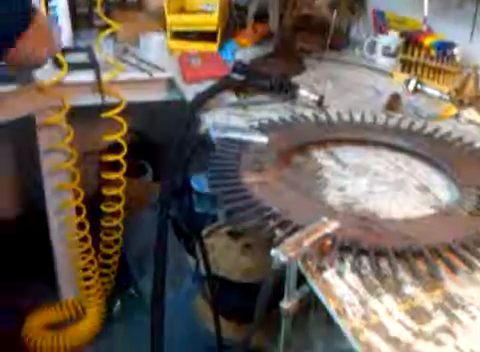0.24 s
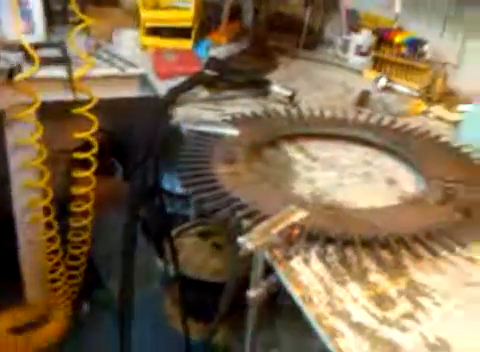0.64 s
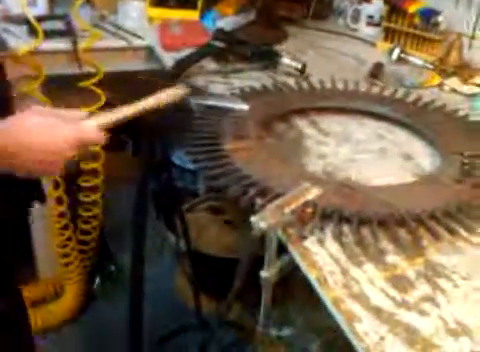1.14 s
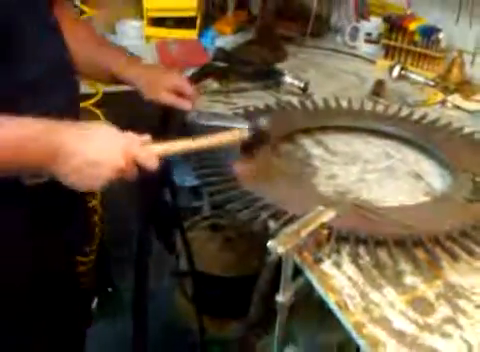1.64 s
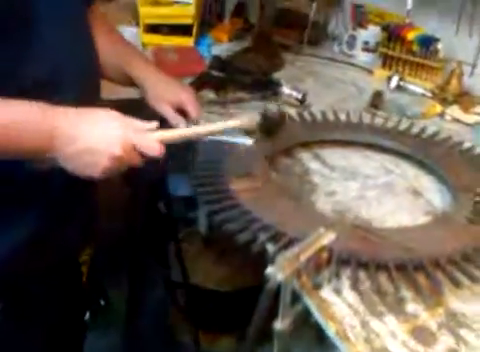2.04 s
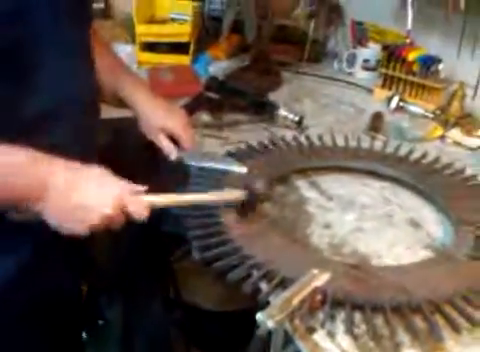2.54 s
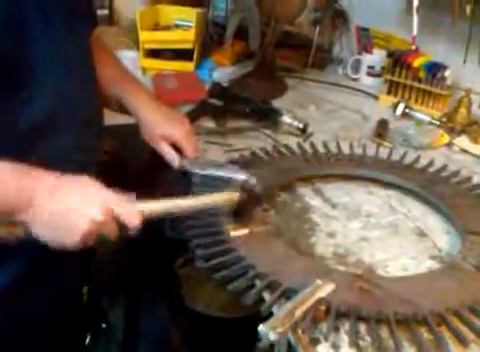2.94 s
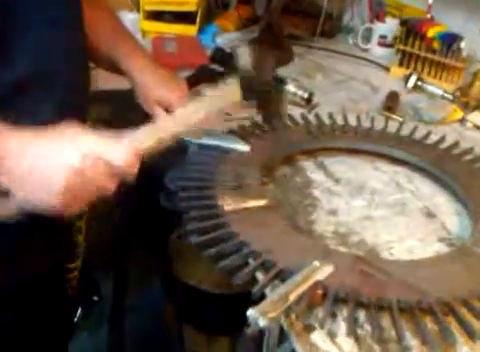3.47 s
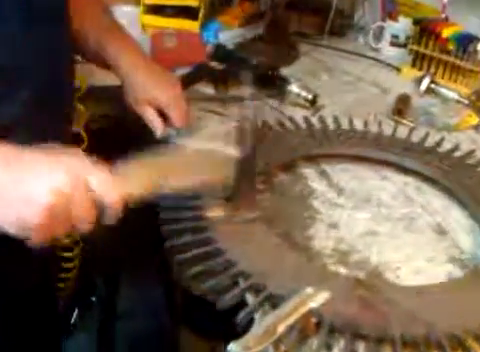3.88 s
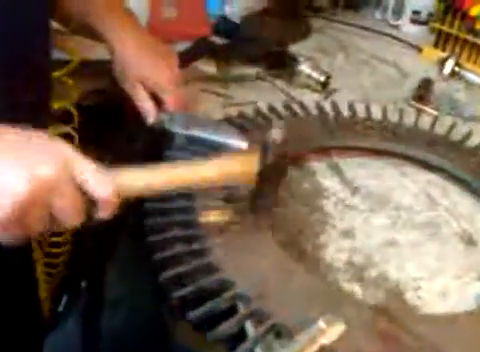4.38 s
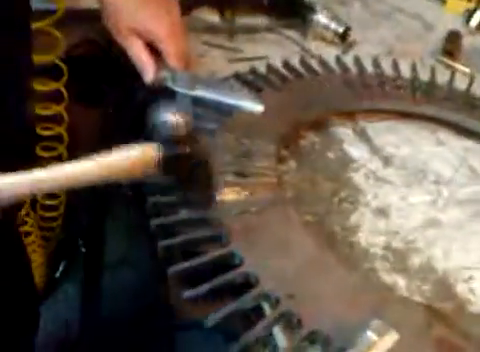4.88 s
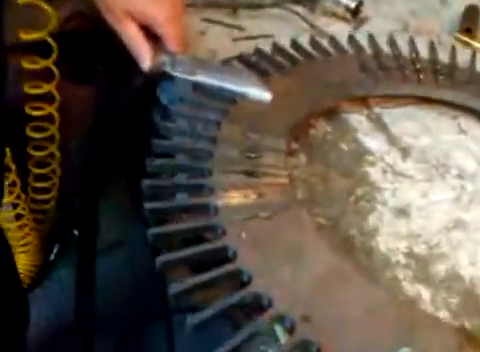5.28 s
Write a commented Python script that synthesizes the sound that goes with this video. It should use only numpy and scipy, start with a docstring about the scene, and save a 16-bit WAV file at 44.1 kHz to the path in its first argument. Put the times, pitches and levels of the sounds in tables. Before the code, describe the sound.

Steady hammer blows clang on a finned metal gear, thumping the workbench and leaving a shimmering ring.

```python
"""A hammer drives a fin into a large steel gear on a workbench: ten blows, about three a second.
Each blow thumps the bench, crashes through the gear and leaves its crown of nearly equal fins ringing.
Before the first blow come soft scuffs, a faint squeak, a tink and a light tap. A distant motor hums
in the small workshop, and the close microphone overloads on the blows."""
import sys
import numpy as np
from scipy import signal
from scipy.fft import rfft, irfft
from scipy.io import wavfile
from scipy.ndimage import uniform_filter1d

SR = 44100
rng = np.random.default_rng(int(sys.argv[2]) if len(sys.argv) > 2 else 0)


def unload_wav(signal):
    """Save mono or channel-first audio to the path in sys.argv[1] as 16-bit WAV at rate SR, clipped to [-1, 1]."""
    wavfile.write(
        sys.argv[1],
        SR,
        np.round(np.clip(np.atleast_2d(signal).T, -1, 1) * 32767).astype(np.int16),
    )


N = 243187

# Still air in the room: (frequency [Hz], relative level [dB])
AIR_SPECTRUM = [(12, -66), (20, -0.5), (131, 0), (205, -9), (237, 1.5), (269, -8.5), (380, 3.5), (420, -9),
                (1250, -16), (1520, -15.5), (2550, -22.5), (5640, -23), (7400, -26.5), (9620, -72.5),
                (16300, -120)]
# Tones of the distant motor: (frequency [Hz], level [dB])
MOTOR_TONES = [(376.8, -70.5), (748.3, -70.5), (1475, -70.5)]
# Soft scuffs, then a light tap just before the first blow:
# (time [s], length [s], level [dB], brightness [dB per octave])
SCUFFS_AND_TAP = [(0.091, 0.057, -51.5, 0), (0.17, 0.085, -54, 1.5), (0.231, 0.17, -45, 2.5),
                  (0.405, 0.13, -56, -6), (1.736, 0.021, -47, 4), (1.753, 0.051, -53.5, 8)]
# Noise of the scuffs and the tap: (frequency [Hz], relative level [dB])
HANDLING_SPECTRUM = [(40, -11), (130, 5.5), (350, -7.5), (550, -9.5), (780, -12), (1100, -18.5),
                     (2500, -33), (7000, -43.5)]
# Tones of a loose piece of steel: (frequency [Hz], level [dB], ring time [s])
# A ring time, or t60, is how long a sound takes to fade by 60 dB.
TINK_TONES = [(4160, -59, 0.22), (5500, -51, 0.077), (5940, -60, 0.17)]
# Dull boom of the room: (frequency [Hz], relative level [dB])
BOOM_SPECTRUM = [(20, 8), (70, -12), (130, 4), (250, -10), (400, -4), (600, -14.5), (1100, -21),
                 (2100, -22), (7000, -51.5)]
# Tones of the bench top under the gear: (frequency [Hz], relative level [dB], ring time [s])
BENCH_TONES = [(76, -32.5, 0.2), (124, -45.5, 0.58), (159.6, -3, 0.14), (205, -14, 0.13),
               (232.9, -9.5, 0.15), (350, -12.5, 0.28), (389.5, -2.5, 0.21), (417, -6, 0.23),
               (556, -23, 0.36), (587, -31, 0.11), (779, -11.5, 0.23), (832, -17.5, 0.27),
               (865, -13.5, 0.12)]
# Gear body, short clank first, then lasting tones: (frequency [Hz], relative level [dB], ring time [s])
GEAR_TONES = [(1155, -18, .22), (1243, -14, .3), (1461, -16, .27), (1800, -18, .2), (2270, -19, .26),
              (2720, -21, .22), (3361, -23, .2), (3965, -18, .2), (4230, -24, .2), (4672, -24, .2),
              (5120, -26, .2), (1244, -23, .75), (1256, -29, 1.15), (1324, -47, 2.2), (1391, -49, 2.2),
              (1480, -43, .8), (1661, -30.5, 2.2), (2357, -34, .55), (2495, -41, 1.4), (2663, -34.5, 1.7),
              (2764, -42, .9), (3079, -47, .9), (3561, -43, 1.2), (4517, -51, 1.5), (4904, -55, 1.4),
              (5060, -49, 1.4), (5437, -27, .5), (5509, -30, .58), (7275, -25, .4), (7345, -32, .33)]
# Bending tones that all fins share: (frequency [Hz], spread [Hz], relative level [dB], ring time [s])
FIN_TONES = [(1672, 3, -36.5, 2.1), (1652, 15, -35.5, 2.0), (2680, 9, -43, 1.8), (3559, 1.5, -54, 1.0),
             (1640, 110, -43, 1.5), (2590, 80, -39, 1.3), (3440, 150, -54, 1.1), (4310, 55, -56, 1.1),
             (5180, 200, -55, 1.1), (5940, 80, -66, 1.1), (6800, 100, -68, .8)]
# Dense crash of gear, bench and room: (frequency [Hz], relative level [dB])
CRASH_SPECTRUM = [(25, -27.5), (70, -7), (170, 1), (400, -2), (520, -1), (800, -2), (1300, 1), (2000, -5),
                  (3400, -1), (5000, 0.5), (6200, -5), (7400, -7)]
# How long early echoes hold the crash up: (frequency [Hz], base hold time [s])
CRASH_HOLD_TIMES = [(200, 0.021), (800, 0.024), (2000, 0.022), (4000, 0.0019)]
# How long the crash then takes to fade: (frequency [Hz], base ring time [s])
CRASH_RING_TIMES = [(60, 0.22), (200, .23), (550, 0.18), (1500, 0.2), (3900, 0.16), (7000, 0.13)]
# Hammer blows: (time [s], force [dB], glancing [0-1], extra fin ring [dB],
# note of the struck spot [Hz], level of that note [dB])
HAMMER_BLOWS = [(1.8324, 1, 0.85, -3, 3850, -30), (2.162, -6, 0, 0, 3960, -40),
                (2.494, -1, 0, 1, 1234, -8.5), (2.8222, 1.5, 0.18, 2.5, 1787, -5.5),
                (3.1595, 1, 0.05, 1, 3994, -13.5), (3.496, .5, 0, -1, 772, -19),
                (3.8356, 2.5, 0.01, 0.5, 3980, -22), (4.188, 2, 0.01, -0.5, 3145, -25.5),
                (4.5746, 4.5, 0, 0, 2313, -9), (4.9689, 6, 0.24, 10, 2250, -1.5)]

TOP_HZ = 7420  # upper edge of the sound
RING_CLOCK = np.arange(2 * SR) / SR  # seconds since a blow


def gain_of(db):
    """Turns decibels into a factor to multiply a sound by."""
    return 10 ** (np.asarray(db) / 20)


def unit_level(x):
    """Scales a signal to an average (rms) size of 1."""
    return x / np.sqrt(np.mean(x ** 2) + 1e-20)


def wobble(samples, smooth_over):
    """A smooth random curve of average size 1."""
    return unit_level(uniform_filter1d(rng.standard_normal(samples), size=smooth_over))


def look_up(points, hz):
    """Reads between (frequency, value) points, giving each octave equal room."""
    known_hz, value = np.transpose(points)
    return np.interp(np.log(hz + 1), np.log(known_hz + 1), value)


def add(mix, start_s, sound):
    """Mixes a sound in at its start time."""
    part = mix[round(start_s * SR):][:len(sound)]
    part += sound[:len(part)]


def colour(noise, spectrum, tilt_db=0):
    """Shapes noise to a spectrum at average size 1; a tilt above 0 dB per octave brightens it."""
    hz = np.fft.rfftfreq(len(noise), 1 / SR)
    octaves = np.log2(np.clip(hz, 60, 4000) / 1000)
    shape = gain_of(look_up(spectrum, hz) + tilt_db * octaves) * (hz < TOP_HZ)
    return unit_level(irfft(rfft(noise) * shape, len(noise)))


def ring(tones, scatter_db=0):
    """A struck object rings with fading tones; scatter varies their strength from hit to hit."""
    out = np.zeros(2 * SR)
    for hz, db, t60 in tones:
        t = np.arange(int(min(1.3 * t60, 2) * SR)) / SR
        start_db = db + scatter_db * rng.standard_normal()
        out[:len(t)] += gain_of(start_db - 60 * t / t60) * np.sin(2 * np.pi * (hz * t + rng.random()))
    return out


def workshop(waver=0.0028, air_db=-55):
    """Still air, and a distant motor whose hum wavers with its speed."""
    speed = 1 + waver * wobble(N, smooth_over=2000)
    motor_time = np.cumsum(speed) / SR
    hum = sum(gain_of(db) * np.sqrt(2) * np.sin(2 * np.pi * hz * motor_time) for hz, db in MOTOR_TONES)
    return hum + gain_of(air_db) * colour(rng.standard_normal(N), AIR_SPECTRUM)


def sole_squeak(length_s=0.1, hz=785, db=-50):
    """A shoe sole sticks and slips, making a tone that swells and fades."""
    t = np.arange(int(length_s * SR)) / SR
    return gain_of(db) * np.sin(np.pi * t / length_s) * np.sin(2 * np.pi * hz * t)


def handling(grain_db=2.0):
    """Soft scuffs, then a light tap just before the first blow; a sole squeaks and loose steel tinks."""
    out = np.zeros(N)
    for start_s, length_s, db, tilt_db in SCUFFS_AND_TAP:
        noise = colour(rng.standard_normal(SR), HANDLING_SPECTRUM, tilt_db)
        noise *= gain_of(grain_db * wobble(SR, smooth_over=300))
        progress = np.linspace(0, 1, int(length_s * SR))
        swell = np.sin(np.pi * progress ** 0.92)
        add(out, start_s, gain_of(db) * unit_level(noise[:len(swell)] * swell))
    add(out, start_s=0.235, sound=sole_squeak())
    add(out, start_s=1.418, sound=ring(TINK_TONES))
    return out


def room_boom(force_db, t60=1.24):
    """A blow lingers in the room as dull, fading noise."""
    rumble = colour(rng.standard_normal(len(RING_CLOCK)), BOOM_SPECTRUM)
    return gain_of(-33 + 0.7 * force_db - 60 * RING_CLOCK / t60) * rumble


def bench_thud(force_db, rise_s=0.0019):
    """The heavy bench takes a few milliseconds to get moving, then rings low."""
    rise = 1 - np.exp(-RING_CLOCK / rise_s)
    return gain_of(-1.5 + 0.7 * force_db) * ring(BENCH_TONES, scatter_db=1.5) * rise


def gear_clank(force_db, extra_fin_db):
    """The body of the gear clanks and rings; what goes into the fins is lost to it."""
    return gain_of(-2.95 + 0.82 * force_db - 0.26 * extra_fin_db) * ring(GEAR_TONES, scatter_db=2.0)


def fin_shimmer(force_db, extra_fin_db, brighten=0.2, fin_count=16):
    """Slightly unequal fins ring at close pitches, which beat against each other and shimmer."""
    drive_db = 2.7 + 0.75 * force_db + extra_fin_db
    hz = np.fft.rfftfreq(len(RING_CLOCK), 1 / SR)
    out = np.zeros(len(RING_CLOCK))
    for centre_hz, spread_hz, db, t60 in FIN_TONES:
        place = (np.arange(fin_count) + rng.random(fin_count)) / fin_count  # 0 lowest, 1 highest
        pitches = centre_hz + spread_hz * np.sqrt(3) * (2 * place - 1)
        sizes = np.sin(np.pi * place) * rng.exponential(1, fin_count)  # a few fins ring far louder
        spectrum = np.zeros(len(hz), complex)
        spectrum[np.searchsorted(hz, pitches)] = sizes * np.exp(2j * np.pi * rng.random(fin_count))
        # a blow that catches the fins squarely wakes their high tones most
        octaves_up = np.log2(centre_hz / FIN_TONES[0][0])
        start_db = db + drive_db * (1 + brighten * octaves_up)
        out += gain_of(start_db - 60 * RING_CLOCK / t60) * unit_level(irfft(spectrum))
    return out


def crash(shared_noise, force_db, glance, extra_fin_db, alike=0.62, clang_db=3.0):
    """Countless short tones and echoes blur into noise, much alike each blow; the treble dies first."""
    tilt_db = -1.23 + 0.08 * force_db + 3 * glance  # hard or glancing blows are brighter
    stretch = 1.02 + 0.034 * extra_fin_db  # ringing fins draw the crash out
    noise = alike * shared_noise + np.sqrt(1 - alike ** 2) * rng.standard_normal(SR)
    # each blow wakes some groups of neighbouring tones more than others
    group_gains = gain_of(clang_db * wobble(SR // 2 + 1, smooth_over=50))
    clang = irfft(rfft(noise) * group_gains, SR)
    hz, t, bands = signal.stft(colour(clang, CRASH_SPECTRUM, tilt_db), SR, nperseg=256)
    hold_s = stretch * look_up(CRASH_HOLD_TIMES, hz)[:, None]
    t60 = stretch * look_up(CRASH_RING_TIMES, hz)[:, None]
    fade = gain_of(force_db - 4 - 60 * np.maximum(t - hold_s, 0) / t60)
    return signal.istft(bands * fade, SR, nperseg=256)[1][:SR]


def hammer(spot_t60=0.28, glance_loss_db=-11):
    """Each blow sets off the crash, bench, gear, fins and room, all louder when it is harder."""
    out = np.zeros(N)
    shared_noise = rng.standard_normal(SR)
    for start_s, force_db, glance, extra_fin_db, spot_hz, spot_db in HAMMER_BLOWS:
        push = gain_of(glance_loss_db * glance)  # a glancing blow hardly moves the bench
        add(out, start_s, crash(shared_noise, force_db, glance, extra_fin_db))
        add(out, start_s, push * bench_thud(force_db))
        add(out, start_s, gear_clank(force_db, extra_fin_db))
        add(out, start_s, ring([(spot_hz, spot_db, spot_t60)]))  # each struck spot has its own note
        add(out, start_s, fin_shimmer(force_db, extra_fin_db))
        add(out, start_s, push * room_boom(force_db))
    return out


def scene():
    """Hammering and handling over the quiet workshop, in one channel."""
    return (hammer() + handling() + workshop())[None]


def record(dry, ceiling=0.82):
    """The overloaded microphone flattens the peaks; then a filter cuts the highest treble."""
    clipped = dry / (1 + (dry / ceiling) ** 6) ** (1 / 6)
    treble_cut = signal.firwin(701, TOP_HZ, window=("kaiser", 8), fs=SR)
    return signal.oaconvolve(clipped, treble_cut[None], "same")


dry = scene()
out = record(dry)
unload_wav(out)
```